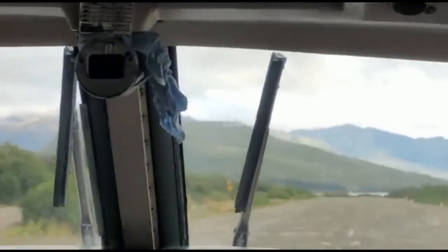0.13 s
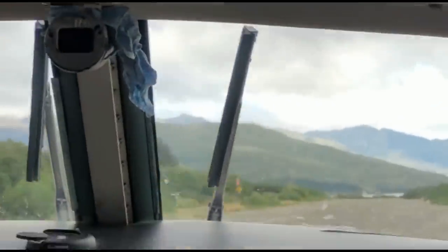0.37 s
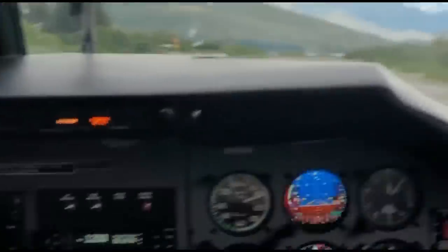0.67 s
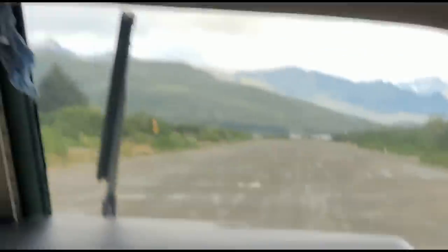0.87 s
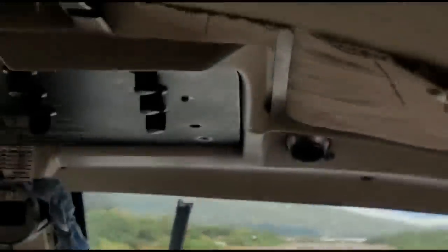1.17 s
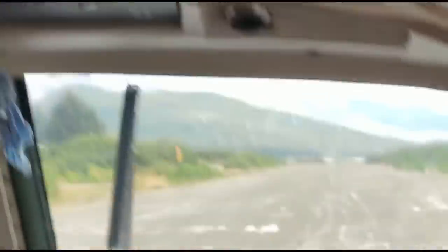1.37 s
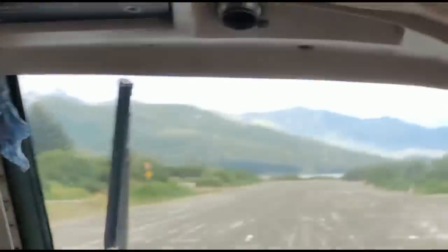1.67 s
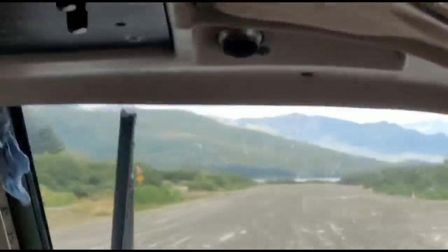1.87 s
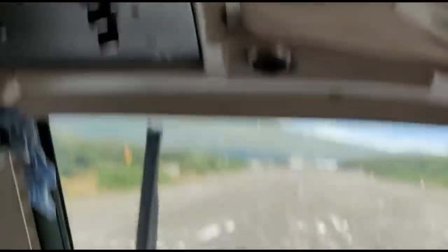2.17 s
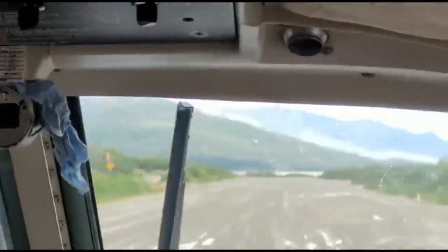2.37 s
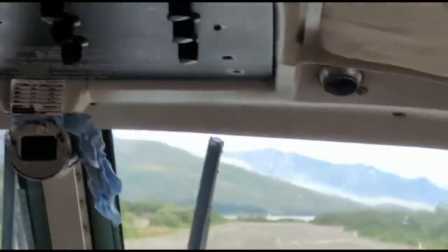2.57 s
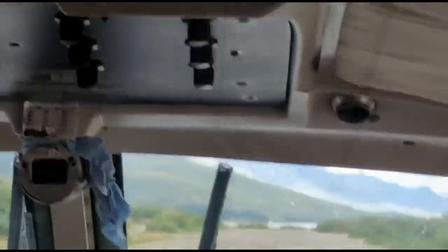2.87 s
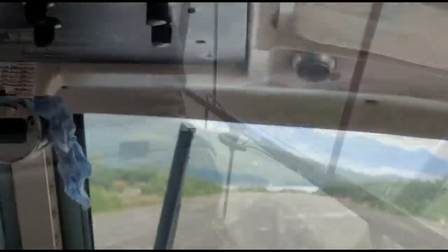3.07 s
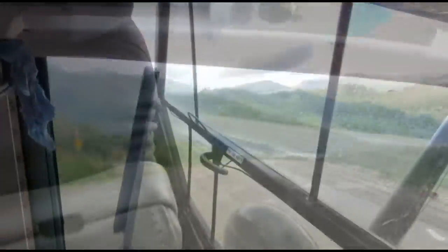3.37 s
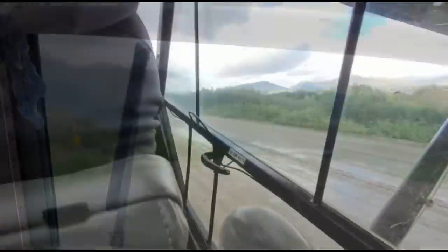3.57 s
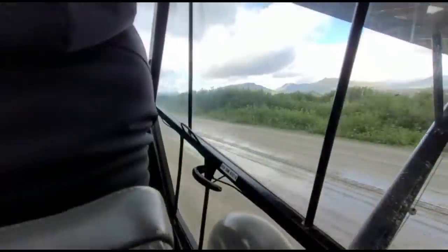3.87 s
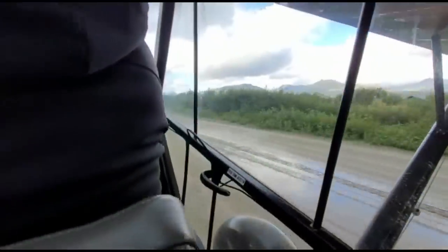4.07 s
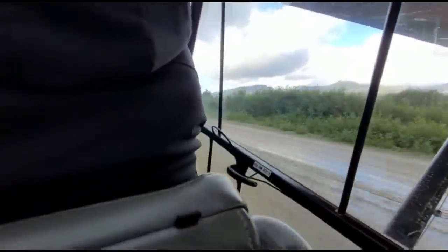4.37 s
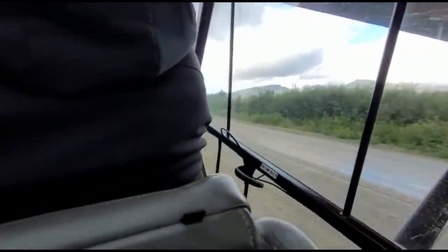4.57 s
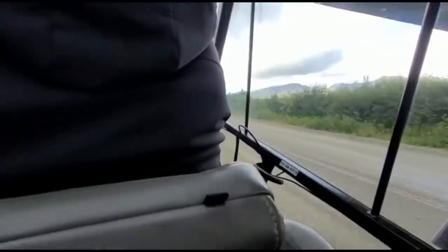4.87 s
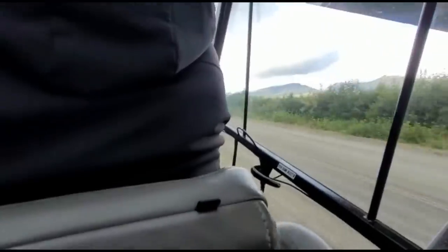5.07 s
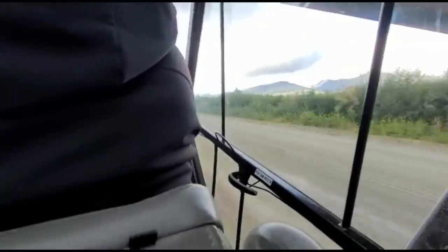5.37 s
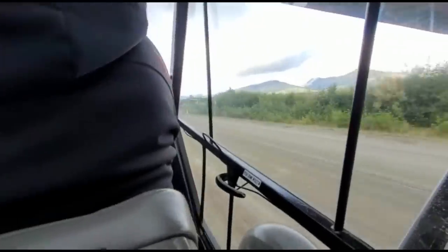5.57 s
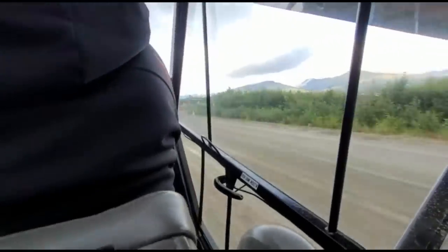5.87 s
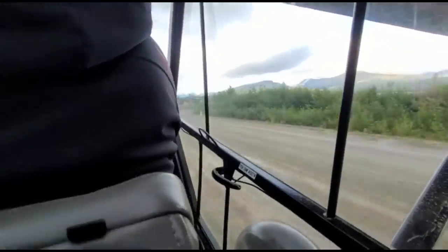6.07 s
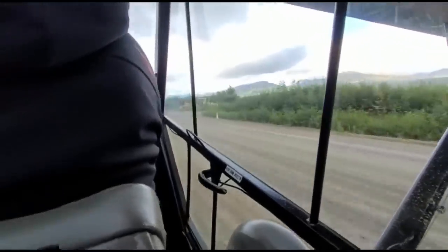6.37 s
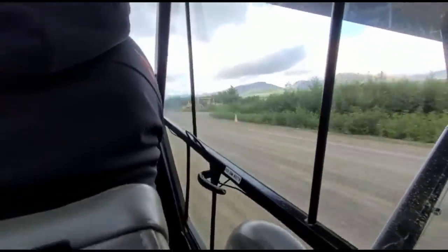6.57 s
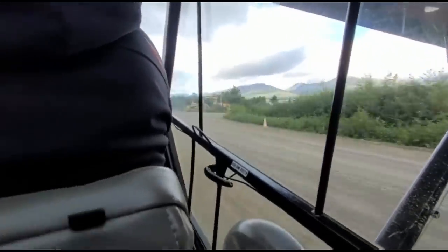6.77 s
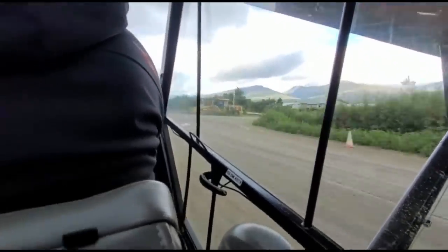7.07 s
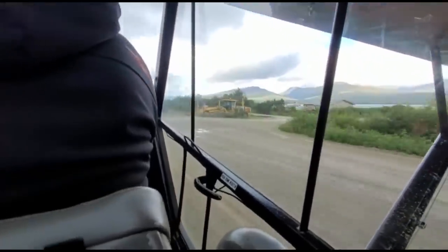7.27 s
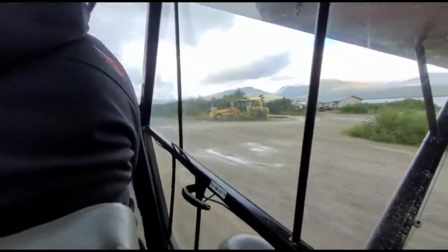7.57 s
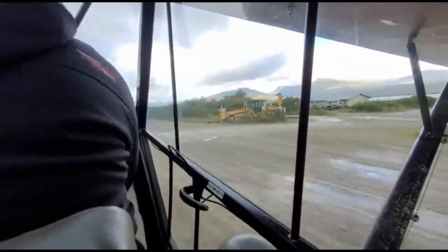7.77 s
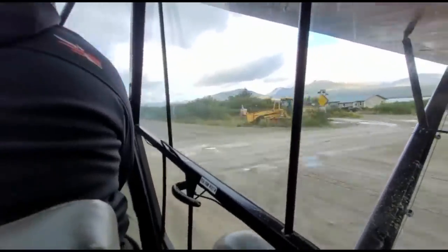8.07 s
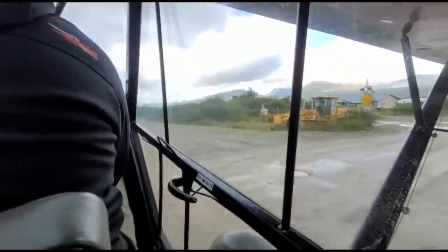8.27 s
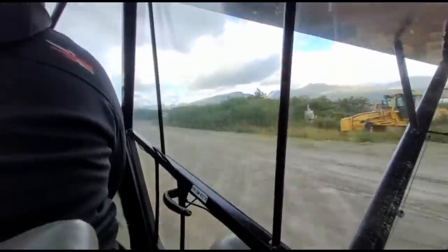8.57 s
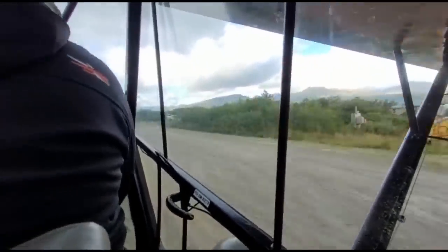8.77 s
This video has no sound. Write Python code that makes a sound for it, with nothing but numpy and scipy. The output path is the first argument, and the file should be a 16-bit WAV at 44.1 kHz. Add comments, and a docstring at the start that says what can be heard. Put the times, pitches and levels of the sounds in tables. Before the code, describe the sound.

Inside a light plane rolling on gravel, throttle closes, squeaks fade, wheels thump and cabin rattles, then a crossfade to full-power engine and propeller drone.

```python
"""A four-cylinder engine and propeller drone at full power inside a light plane: a sine line over engine orders and
exhaust pulses, with throbbing air noise, gravel spray and single stones ticking on the hull.
Before it, inside another plane rolling over a gravel strip as the throttle closes, stick-slip squeaks die
away, a propeller of sliding partials runs down, and noise bursts thump the wheels and rattle the cabin.
The second plane starts to fade in just before 3 s and has taken over by 3.83 s."""
import sys
import numpy as np
from scipy import signal
from scipy.fft import rfft, irfft, next_fast_len
from scipy.io import wavfile
from scipy.ndimage import uniform_filter1d, map_coordinates

SR = 44100
rng = np.random.default_rng(int(sys.argv[2]) if len(sys.argv) > 2 else 0)


def waveform_to_disk(signal):
    """Save audio, clipped to [-1, 1], as 16-bit WAV at the path in sys.argv[1]."""
    frames = np.transpose(np.atleast_2d(signal))
    scaled = np.clip(frames, -1, 1) * 32767
    samples = np.round(scaled).astype(np.int16)
    wavfile.write(sys.argv[1], SR, samples)


N = 393813
TIME = np.arange(N) / SR

# Second plane: firing rate of the engine [t/s, rate/firings per s]
FIRING_RATE = [(3.3, 78.45), (4, 79.22), (4.65, 79.5), (5.9, 79.75), (7.15, 79.82), (8.93, 80.5)]
# Third blade harmonic, swelling with the place in the cabin [t/s, level/dB]
THIRD_HARMONIC = [(4.6, -32.5), (5.7, -24), (6.2, -30.5), (6.8, -33.5), (7.4, -25), (8.4, -23), (8.93, -30)]
# Firing order and unequal strength of the cylinders [place/cycles, level/dB]
CYLINDERS = [(.12, -5), (.41, -13), (.66, -2), (0.869, -9)]
# Engine orders between the cabin's resonances [f/Hz, level/dB]
ORDER_SLOPE = [(40, -27), (60, -22), (100, -34), (220, -35), (450, -35), (750, -35), (1040, -42),
               (1400, -48), (2200, -49), (2700, -53)]
# Cabin resonances that lift the orders [f/Hz, half width/Hz, lift/dB]
RESONANCES = [(133, 24, 14.5), (177, 26, 13.5), (282, 16, 14), (322, 27, 15), (389, 19, 14), (527, 16, 8),
              (560, 12, 13.5), (607, 15, 12.5), (860, 12, 8), (1160, 45, 8), (1218, 22, 10), (1280, 18, 7),
              (1525, 35, 4), (2072, 18, 10)]
# Noise colours of the second plane, relative power density [f/Hz, level/dB]
BARK_COLOUR = [(450, -42), (700, 3), (860, 1.5), (1030, -3), (1190, -1), (1290, 6), (1380, 2), (1550, -6),
               (2070, -9), (2600, -19.5), (2900, -18), (6000, -47)]
RUMBLE_COLOUR = [(15, -29), (40, -1.5), (70, -2.5), (140, 0), (200, -6.5), (270, 1.5), (380, -5), (470, -7),
                 (570, -5.5), (700, -16), (1000, -43.5), (2000, -76)]
RUSH_COLOUR = [(450, -36), (650, -1.5), (860, -6), (1050, -7.5), (1190, -1), (1290, -6.5), (1380, -20),
               (1560, -7), (2100, -11.5), (2580, -13), (2850, -16.5), (3400, -20), (5500, -26.5),
               (9000, -60)]
HISS_COLOUR = [(2500, -24), (4500, -10.5), (5800, 0.5), (6800, -2), (7700, 0), (8700, -4), (10000, -0.5),
               (11700, -0.5), (13500, -3.5), (16000, -4.5)]
TICK_COLOUR = [(2000, -25), (5400, -10), (8500, -11), (10500, 0), (11900, -4), (13500, -7), (16000, -17)]
# Stones hitting the hull [t/s, level/dB]
STONES = [(3.254, -38), (3.398, -36), (3.76, -37), (4.41, -38), (7.18, -37), (8.167, -35), (8.227, -30),
          (8.864, -29)]
# Ear balance in the second plane, up on the left and down on the right [f/Hz, level/dB]
SECOND_SEAT = [(60, 0.43), (130, 0.8), (260, -1.5), (520, -0.5), (1100, -1.5), (2000, -2), (4000, 1.6),
               (8000, 0.5), (12000, 0.3)]

# First plane: the propeller running down [t/s, blade pass f/Hz]
BLADE_PASS = [(0, 84.7), (.6, 84.43), (1.05, 83.6), (1.35, 81.12), (1.9, 70), (2.3, 66.07), (3, 61.67),
              (3.7, 60)]
# How strongly the cabin carries a blade harmonic [f/Hz, level/dB]
CABIN_RESPONSE = [(120, -31), (136, -21), (153, -36), (169, -24), (187, -30), (208, -16), (229, -16.5),
                  (255, -32.5), (340, -31), (430, -37), (600, -39.5)]
# Pace of the squeaks [t/s, rate/squeaks per s]
SQUEAK_RATE = [(0, 19.6), (.4, 16.4), (.55, 17.8)]
# Overtones of the squeal [harmonic/number, level/dB]
SQUEAL_TONES = [(2, -6), (3, 2.5), (4, 4), (5, -0.5), (6, 1), (7, -5.5), (8, -12), (10, -17), (13, -10),
                (14, -6), (15, -8), (17, -21), (19, -15)]
# Roughness of the strip under the wheels [t/s, level/dB]
ROUGHNESS = [(0, -3.5), (.33, 1), (.62, -2.5), (1.02, -9.5), (1.2, -2.5), (1.4, 0.5), (2.08, -1), (2.5, -5),
             (3, -5), (3.3, -5.5)]
# Bumps under the wheels, timed at the peak [t/s, thump level/dB, boom level/dB]
BUMPS = [(.38, -13, -18), (.44, -15, -19), (.71, -11, -24.5), (.87, -16.5, -31), (1.36, -10, -18),
         (1.53, -17, -17.5), (1.95, -8, -14), (2.1, -22, -19.5), (2.25, -17, -24), (2.66, -22, -33),
         (2.87, -16.5, -31)]
# Jolts of the cabin [t/s, clatter level/dB, t60/s]
JOLTS = [(.441, -37, .05), (.706, -41.5, 0.097), (.745, -46, 0.11), (1.191, -44, .03), (1.334, -43.5, 0.14),
         (1.405, -45, 0.14), (1.513, -41.5, 0.15), (1.53, -41.5, 0.11), (1.56, -37, 0.072),
         (1.62, -44, 0.029), (1.921, -43, .11), (1.97, -46, 0.1), (2.298, -42.5, .05), (2.735, -51, .025),
         (2.968, -48, .03)]
# Ringing modes of a loose metal fitting [f/Hz, level/dB, t60/s]
FITTING_MODES = [(6900, 2, 0.14), (9351, -4, 0.18), (11750, -7, .11)]
# Noise colours of the first plane, relative power density [f/Hz, level/dB]
THUMP_COLOUR = [(15, -37), (28, -23), (42, 3), (58, 5.5), (80, 4.5), (120, 0.5), (170, -14), (300, -67.5)]
BOOM_COLOUR = [(70, -48), (125, 2), (180, -5), (240, 1), (320, -9.5), (480, -18.5), (650, -31.5),
               (1000, -35.5), (2000, -68)]
AIR_COLOUR = [(290, -30), (500, -7.5), (585, -9), (792, -12), (996, -16.5), (1220, -17.5), (1350, -16.5),
              (1940, -15.5), (2820, -26), (4680, -30), (5750, -39.5), (9000, -46), (11700, -73),
              (19800, -120)]
TRIM_COLOUR = [(1500, -34), (4000, -4), (7000, -5.5), (8800, -4.5), (11000, -1), (13500, -2), (16000, -9)]
# Ear balance in the first plane, up on the left and down on the right [f/Hz, level/dB]
FIRST_SEAT = [(60, -0.5), (150, -1.5), (380, 0), (950, -0.2), (2400, 2), (6000, 1.6), (15000, 0.5)]
# Left-right likeness of the sound in a cabin, 1 is mono [f/Hz, likeness/0 to 1]
LIKENESS = [(60, 0.88), (150, 1), (380, 0.84), (950, 0.33), (2400, 0)]

# Second plane: base levels, then growth as the plane gathers speed
DRONE_DB, ORDERS_DB, RUMBLE_DB, BARK_DB, RUSH_DB, HISS_DB = -9.5, -10, -23.5, -38, -32.5, -45
EXHAUST_GROWS_DB_PER_S, RUSH_GROWS_DB_PER_S = 0.46, 0.5
HALF_ORDER_DB, HALF_ORDER_HZ = -4.5, 634  # above this, orders between the crankshaft's own are weaker

# First plane: the throttle closes; each layer is this much louder while it is open
CLOSE_START_S, CLOSE_END_S = 0.42, 0.54
PROP_OPEN_DB, AIR_OPEN_DB, TRIM_OPEN_DB = 9, 6.5, 9.5
BLADE_TILT_DB = -2  # per harmonic above the second
BLADE_SPEED_POWER = 1.55  # strength grows as this power of the speed
SQUEAK_DB, SQUEAK_HOLD_S, SQUEAK_FADE_DB_PER_S = -47.5, 0.37, 42

# Rolling: base levels; air and trim die down as the plane slows
WHEELS_DB, HULL_DB, AIR_DB, TRIM_DB = -16.5, -19, -37.5, -55.5
AIR_FALL_DB_PER_S, TRIM_FALL_DB_PER_S, SLOWING_S = 3, 5, 1.52
AIR_FOLLOWS, TRIM_FOLLOWS = 0.29, 0.25  # dB per dB of roughness
BUMP_RISE_S, BUMP_FALL_S = 0.031, 0.04
AIR_BUMP_DB, TRIM_BUMP_DB = -30, -44  # these layers' share of a bump's boom
# Crunch relative to the clatter at this t60; longer jolts crunch more
CRUNCH_DB, CRUNCH_T60_S, CRUNCH_DB_PER_DOUBLING = 11.5, 0.11, 6
FITTING_S, FITTING_DB = 1.56, -45  # a hard jolt strikes the fitting

# Second plane starts in, first starts out, change complete
FADE_IN_S, FADE_OUT_S, FADE_END_S = 2.976, 3.47, 3.83
FADE_SHAPE = 0.81  # under 1: the second plane comes in quickly, then settles
TOP_HZ = 15850  # band limit


def drone(cycles, left_lead=0.19):
    """Four firings and four blade passes a cycle make the main line; its third harmonic swells over it."""
    # left_lead in radians: a little earlier at the left ear
    phase = 2 * np.pi * len(CYLINDERS) * cycles + left_lead * np.array([[0.5], [-0.5]])
    level_db = DRONE_DB + 0.25 * wobble(12) + 0.25 * wobble(1.5)
    main = amp(level_db) * np.sqrt(2) * np.sin(phase)
    third = amp(curves(THIRD_HARMONIC)[0] + wobble(6)) * tone(cycles, 12, spread=0.5)
    return main + third


def engine_orders(cycles, waver=0.14, count=135):
    """Unequal cylinders fill in other multiples of the cycle rate; the cabin lifts some, and they waver."""
    order = np.arange(count)
    hz = order * (cycles[-1] / TIME[-1])
    lifts = sum(lift * np.exp(-((hz - centre) / width) ** 2) for centre, width, lift in RESONANCES)
    half_order_db = HALF_ORDER_DB * (order % 2) * (hz > HALF_ORDER_HZ)
    level_db = along(ORDER_SLOPE, hz) + lifts + half_order_db
    sounding = ~np.isin(order, [0, 1, 4, 12])  # the drone already holds 4 and 12
    apart = np.arccos(np.clip(along(LIKENESS, hz), -1, 1)) * rng.choice([-1, 1], count)
    phase = 2 * np.pi * rng.random(count) + np.array([apart, -apart]) / 2
    lines = sounding * amp(level_db) * np.exp(1j * phase)
    # copies with scrambled phases drift in and out, so each order wavers differently
    drift = 0
    for _ in range(3):
        scrambled = lines * np.exp(2j * np.pi * rng.random(count))
        drift = drift + wobble(5) * repeating(cycles, scrambled)
    return repeating(cycles, lines) + waver * drift


def repeating(cycles, lines, size=32768):
    """A stereo wave that repeats every engine cycle, from the complex rms strength of each order."""
    wave = irfft(lines, size) * size / np.sqrt(2)
    return wave[:, (cycles % 1 * size).astype(int)]


def exhaust_bark(cycles, scatter_db=2.5):
    """Each cylinder fires with its own strength; the pulses ring briefly in the cabin."""
    jitter_s, cabin_t60 = 0.00006, 0.02
    pulses = np.zeros(N)
    for place, db in CYLINDERS:
        at = np.interp(np.arange(int(cycles[-1]) - 1) + place, cycles, TIME)
        late, size = rng.standard_normal((len(at), 2)).T
        sample = np.clip((at + jitter_s * late) * SR, 0, N - 1).astype(int)
        pulses += np.bincount(sample, amp(db + scatter_db * size), N)
    age = TIME[:4096]
    cabin = rng.standard_normal((2, len(age))) * amp(-60 * age / cabin_t60)
    return coloured(signal.fftconvolve(pulses[None], cabin, axes=1)[:, :N], BARK_COLOUR)


def exhaust_rumble(puffs):
    """Low exhaust noise swells with the puff of each firing."""
    return noise(RUMBLE_COLOUR, 1 + 0.4 * puffs)


def slipstream_rush(puffs):
    """Slipstream noise throbs at each firing while its colour drifts."""
    return patchy(noise(RUSH_COLOUR, 1 + 0.69 * puffs), depth_db=1.98)


def hull_hiss(puffs):
    """Air hisses with the firings, roughened by a spray of tiny gravel contacts."""
    spray = grains(rate=120, spread_db=2.0, life=0.0016)
    return patchy(noise(HISS_COLOUR, (1 + 0.26 * puffs) * spray), depth_db=1.5)


def hull_stones():
    """Single thrown stones strike the hull as short bright ticks of noise."""
    blows = sum(amp(db) * decay(s, t60=0.025) for s, db in STONES)
    return blows * noise(TICK_COLOUR)


def full_power():
    """The engine at takeoff speed drives drone, exhaust and slipstream from one shared cycle."""
    cycle_hz = curves(FIRING_RATE)[0] / len(CYLINDERS)
    cycles = np.cumsum(cycle_hz * (1 + 0.000811 * wobble(9))) / SR
    puffs = sum(amp(db) * np.exp(-((cycles - place) % 1) / 0.25) for place, db in CYLINDERS)
    running = np.maximum(TIME - FADE_END_S, 0)
    exhaust_db = EXHAUST_GROWS_DB_PER_S * running
    flow_db = RUSH_GROWS_DB_PER_S * running + 0.5 * wobble(14)
    orders = amp(ORDERS_DB + exhaust_db) * engine_orders(cycles)
    bark = amp(BARK_DB + flow_db) * exhaust_bark(cycles)
    rumble = amp(RUMBLE_DB + exhaust_db) * exhaust_rumble(puffs)
    rush = amp(RUSH_DB + flow_db) * slipstream_rush(puffs)
    hiss = amp(HISS_DB + flow_db) * hull_hiss(puffs)
    fade = np.interp(TIME, [FADE_IN_S, FADE_END_S], [0, 1]) ** FADE_SHAPE
    engine = drone(cycles) + orders + bark + rumble + rush + hiss
    return seated(fade * engine + hull_stones(), SECOND_SEAT, lead=0.0002)


def throttle():
    """First plane's throttle: 1 open, 0 closed."""
    return np.interp(TIME, [CLOSE_START_S, CLOSE_END_S], [1, 0])


def windmilling_prop():
    """The propeller slows and weakens; its low harmonics slide through the cabin's resonances."""
    hz, = curves(BLADE_PASS)
    turns = np.cumsum(hz * (1 + 0.0033 * wobble(12))) / SR
    hum = np.zeros((2, N))
    for harmonic in range(2, 8):
        flutter_db = 0.87 * (harmonic - 1) ** 0.66 * wobble(19)
        level_db = along(CABIN_RESPONSE, harmonic * hz) + BLADE_TILT_DB * (harmonic - 2) + flutter_db
        hum += amp(level_db) * tone(turns, harmonic, spread=0.53)
    return amp(PROP_OPEN_DB * throttle()) * (hz / hz[0]) ** BLADE_SPEED_POWER * hum


def squeal(hz=782.0, bend=0.012, duty=0.72, uneven=0.16, edge=0.12):
    """Engine shake rubs a loose part: uneven stick-slip squeaks, each bending up a little, die away."""
    place = (np.cumsum(curves(SQUEAK_RATE)[0]) / SR + 0.08) % 1
    length = np.clip(duty + uneven * wobble(14), 0.4, 1)  # share of each squeak period
    rubbing = np.clip(np.minimum(place, length - place) / edge, 0, 1)
    pitch = 1 + 0.0012 * wobble(90) + bend * rubbing * (place / length - 0.5)
    turns = np.cumsum(hz * pitch) / SR
    rub = sum(amp(db) * tone(turns, harmonic, spread=1.67) for harmonic, db in SQUEAL_TONES)
    level_db = SQUEAK_DB - SQUEAK_FADE_DB_PER_S * np.maximum(TIME - SQUEAK_HOLD_S, 0)
    flutter_db = 1.5 * wobble(190) + 1.1 * wobble(19)
    return amp(level_db + flutter_db) * rubbing * rub


def jolts():
    """Bumps shake the cabin: a gritty clatter, a duller crunch and a ringing fitting."""
    clatter, crunch = np.zeros(N), np.zeros(N)
    for s, db, t60 in JOLTS:
        crunch_db = CRUNCH_DB + CRUNCH_DB_PER_DOUBLING * np.log2(t60 / CRUNCH_T60_S)
        blow = decay(s, t60)
        clatter += amp(db) * blow
        crunch += amp(db + crunch_db) * blow
    ring = np.zeros((2, N))
    for hz, db, t60 in FITTING_MODES:
        ring += amp(FITTING_DB + db) * decay(FITTING_S, t60) * tone(TIME, hz, spread=1.4)
    grit = noise(TRIM_COLOUR, grains(rate=500, spread_db=0.5, life=0.001))
    return clatter * grit + crunch * noise(AIR_COLOUR) + ring


def ground_roll():
    """Rough ground and bumps make the wheels thump, the hull boom and the trim rattle; air flows past."""
    rough_db, = curves(ROUGHNESS)
    swells = []
    for s, _, _ in BUMPS:
        width = np.where(TIME < s, BUMP_RISE_S, BUMP_FALL_S)
        swells.append(np.exp(-((TIME - s) / width) ** 2 / 2))
    thumps, booms = amp(np.transpose(BUMPS)[1:]) @ np.array(swells)
    slowed = np.maximum(TIME - SLOWING_S, 0)
    air_db = AIR_DB + AIR_OPEN_DB * throttle() + AIR_FOLLOWS * rough_db - AIR_FALL_DB_PER_S * slowed
    trim_db = TRIM_DB + TRIM_OPEN_DB * throttle() + TRIM_FOLLOWS * rough_db - TRIM_FALL_DB_PER_S * slowed
    # steady and bump levels add in power
    wheels = np.hypot(amp(WHEELS_DB + rough_db), thumps) * noise(THUMP_COLOUR)
    hull = np.hypot(amp(HULL_DB + rough_db), booms) * noise(BOOM_COLOUR)
    flow = patchy(noise(AIR_COLOUR, amp(0.72 * wobble(70))), depth_db=1.0)
    air = np.hypot(amp(air_db), amp(AIR_BUMP_DB) * booms) * flow
    rattle = noise(TRIM_COLOUR, grains(rate=100, spread_db=3.0, life=0.0015))
    trim = np.hypot(amp(trim_db), amp(TRIM_BUMP_DB) * booms) * rattle
    return wheels + hull + air + trim


def tone(turns, harmonic, spread):
    """One partial of rms 1; the cabin gives it a different phase at each ear (spread in radians)."""
    start, apart = rng.random(), rng.choice([-1, 1]) * spread / 2
    phase = 2 * np.pi * ((harmonic * turns + start) % 1) + np.array([[apart], [-apart]])
    return np.sqrt(2) * np.sin(phase.astype(np.float32))


def decay(s, t60):
    """The envelope of a blow at time s: a sudden rise, then an exponential fall."""
    age = np.maximum(TIME - s, 0)
    return (1 - np.exp(-age / 0.0004)) * amp(-60 * np.minimum(age / t60, 3))


def grains(rate, spread_db, life):
    """The envelope of many tiny random contacts (rate per s, life in s) over a steady bed."""
    chance = rng.random(N)
    size = np.minimum(rng.exponential(size=N), 4)
    hits = (chance < rate / SR) * amp(spread_db * size) ** 2
    power = 1 + signal.lfilter([1], [1, -np.exp(-1 / (life * SR))], hits)
    return np.sqrt(power)


def noise(spectrum, swell=1):
    """Stereo noise of rms 1, its strength following swell."""
    return coloured(swell * rng.standard_normal((2, N)), spectrum)


def coloured(pair, spectrum):
    """Two unrelated signals as a stereo sound of rms 1, near mono in the bass."""
    def response(hz):
        turn = np.arccos(np.clip(along(LIKENESS, hz), -1, 1)) / 2
        return amp(along(spectrum, hz)) * [np.cos(turn), np.sin(turn)]
    mid, side = filtered(pair, response)
    return unit(np.array([mid + side, mid - side]))


def patchy(x, depth_db):
    """Random gain, smooth over time and frequency, makes the colour of a noise drift."""
    z = signal.stft(x, nperseg=1024)[2]
    field = uniform_filter1d(rng.standard_normal(z.shape[1:]), 4, axis=0)  # smooth over frequency
    field = uniform_filter1d(field, 14, axis=1)  # smooth over time
    return unit(signal.istft(z * amp(depth_db * unit(field)), nperseg=1024)[1][:, :N])


def seated(x, balance, lead=0):
    """The near wall favours one ear; lead is how much earlier the left one hears it (s)."""
    sides = np.array([[1], [-1]])

    def response(hz):
        return amp(sides * along(balance, hz)) * np.exp(1j * np.pi * sides * hz * lead)
    return filtered(x, response)


def filtered(x, response):
    """x times a response of frequency."""
    m = next_fast_len(N + 8192)
    return irfft(rfft(x, m) * response(np.fft.rfftfreq(m, 1 / SR)), m)[..., :N]


def wobble(rate):
    """A smooth random curve, rate knots a second."""
    coarse = TIME[::64]
    knots = rng.standard_normal(int(TIME[-1] * rate) + 4)
    return np.interp(TIME, coarse, map_coordinates(knots, [coarse * rate]))


def curves(rows):
    """One value per sample for each column after the time."""
    s, *cols = np.transpose(rows)
    return [np.interp(TIME, s, c) for c in cols]


def along(points, hz):
    """Values at hz, read between (f/Hz, value) points on a log axis."""
    f, v = np.transpose(points)
    return np.interp(np.log(hz + 1), np.log(f + 1), v)


def amp(db):
    """Decibels to gain."""
    return 10 ** (np.asarray(db) / 20)


def unit(x):
    """Scaled to rms 1."""
    return x / np.sqrt(np.mean(x ** 2) + 1e-20)


def scene():
    """The rolling plane gives way to the one at full power."""
    rolling = windmilling_prop() + squeal() + ground_roll() + jolts()
    fade = np.interp(TIME, [FADE_OUT_S, FADE_END_S], [1, 0])
    return full_power() + seated(fade * rolling, FIRST_SEAT)


def record(dry):
    """The highest peaks are rounded off, and nothing is kept above the band limit."""
    rounded = dry / (1 + np.abs(dry) ** 10) ** (1 / 10)
    return filtered(rounded, lambda hz: hz < TOP_HZ)


dry = scene()
out = record(dry)
waveform_to_disk(out)
```